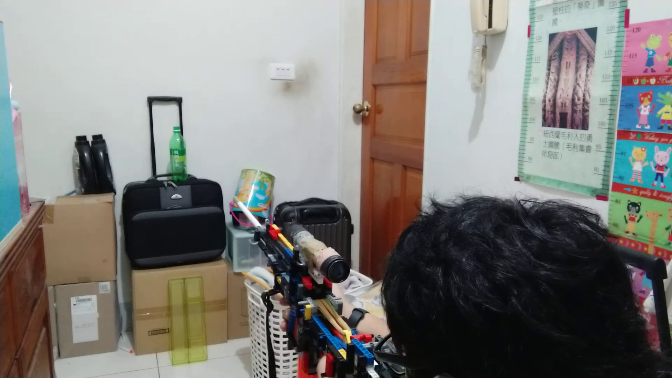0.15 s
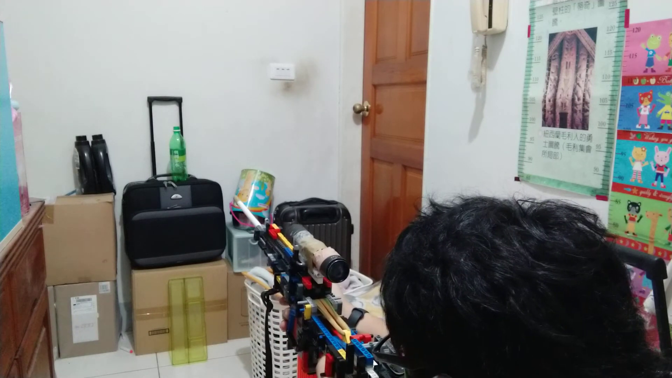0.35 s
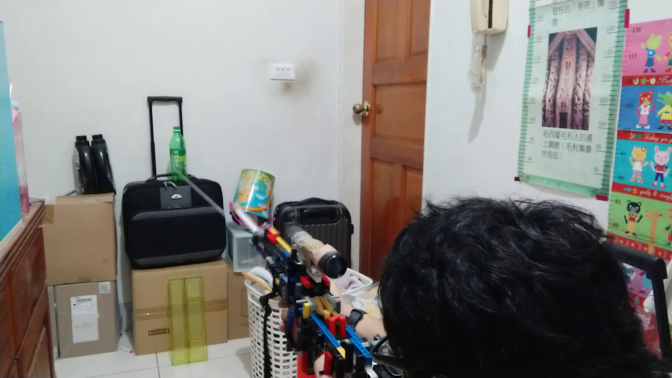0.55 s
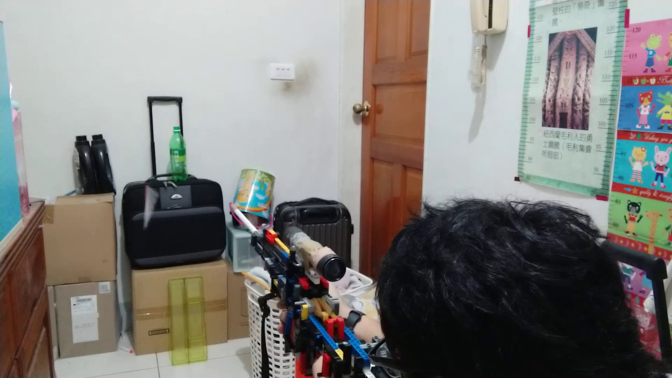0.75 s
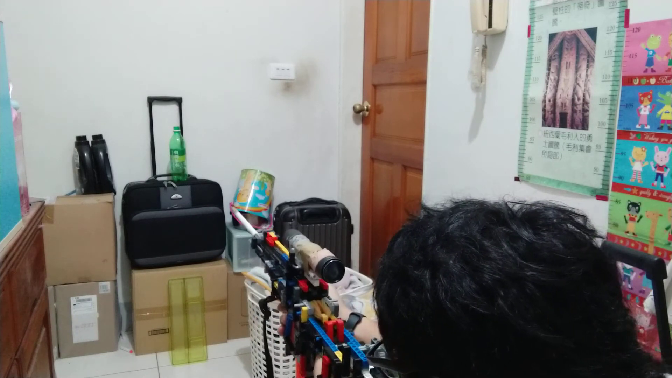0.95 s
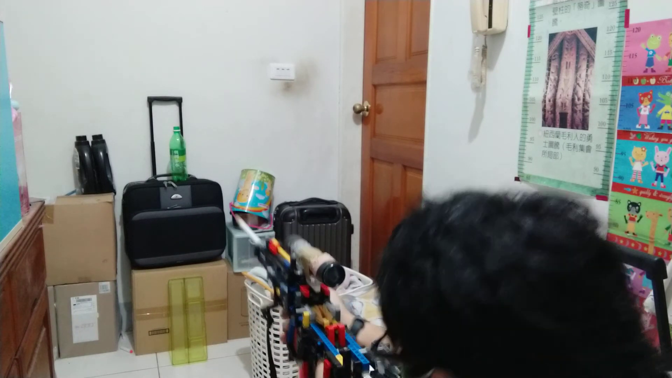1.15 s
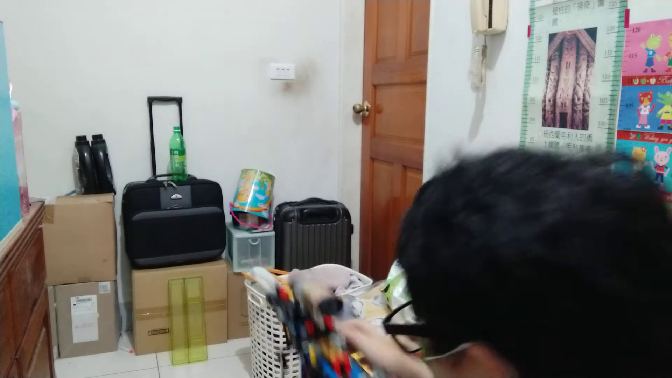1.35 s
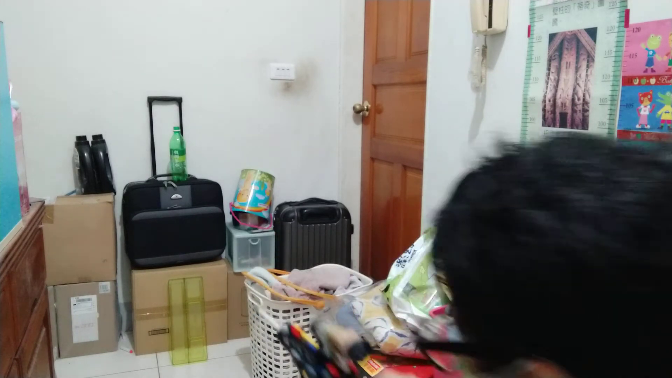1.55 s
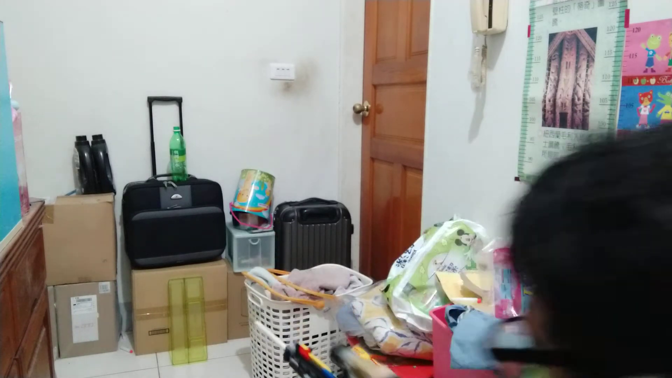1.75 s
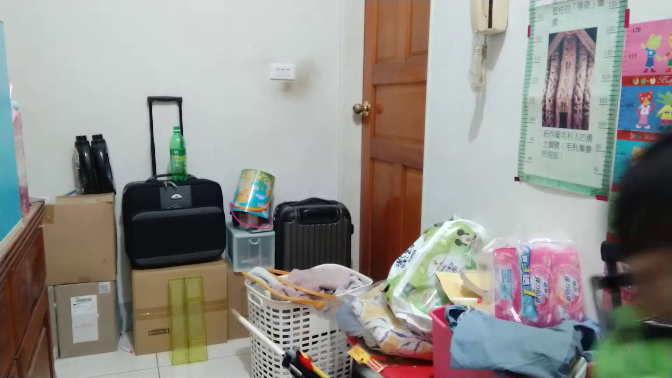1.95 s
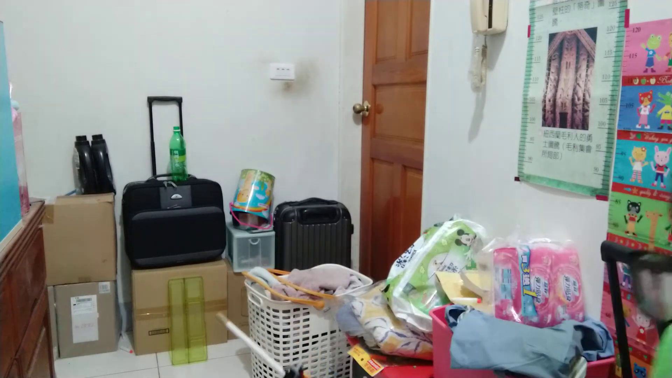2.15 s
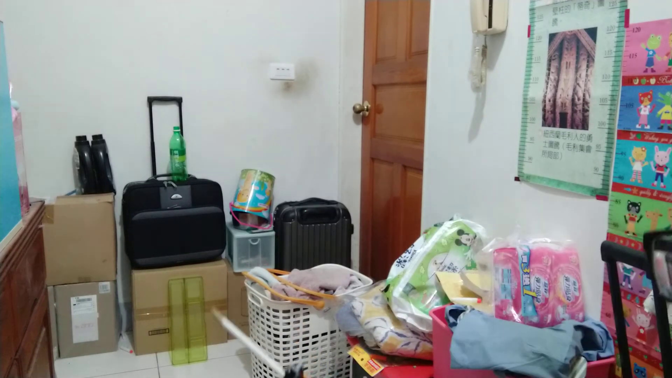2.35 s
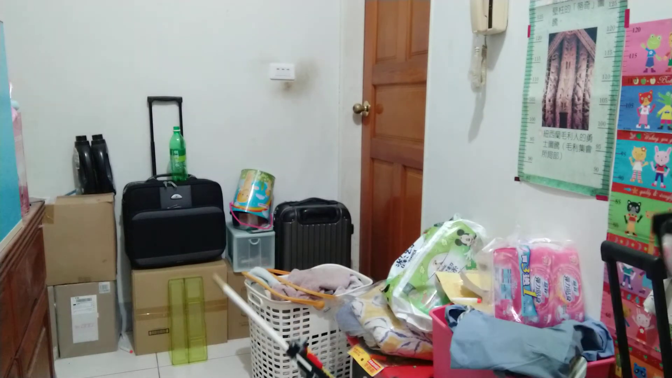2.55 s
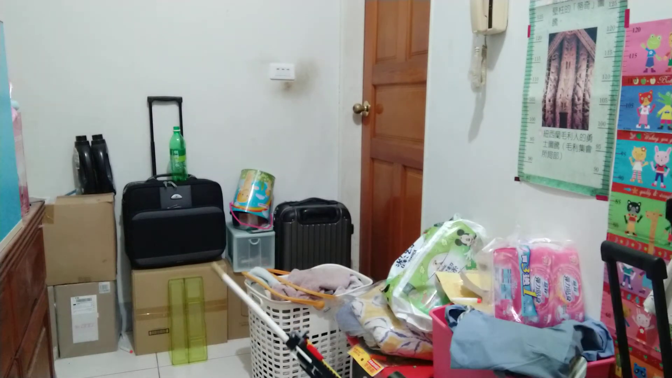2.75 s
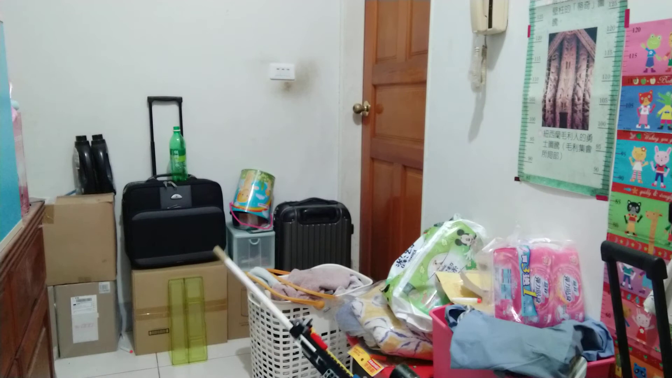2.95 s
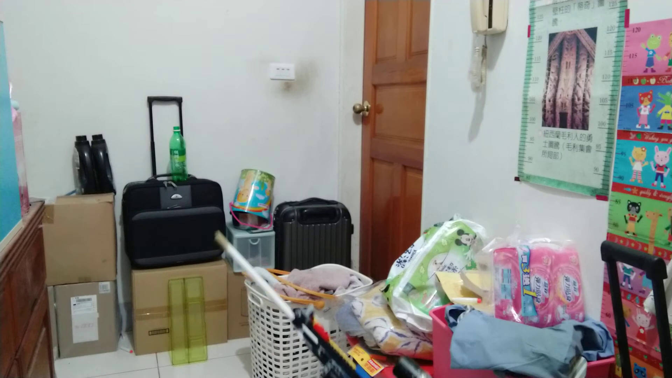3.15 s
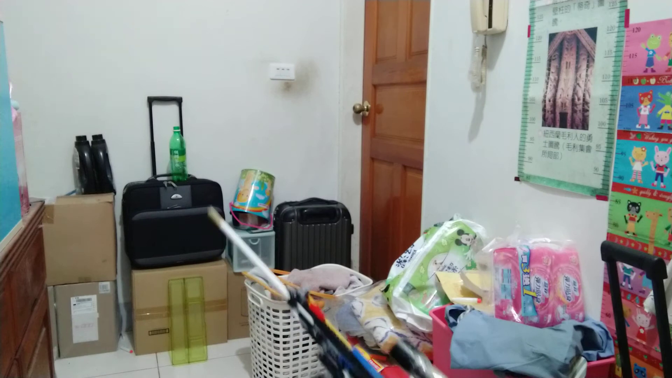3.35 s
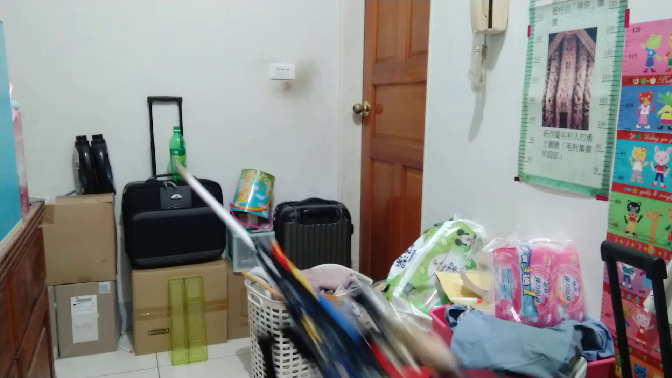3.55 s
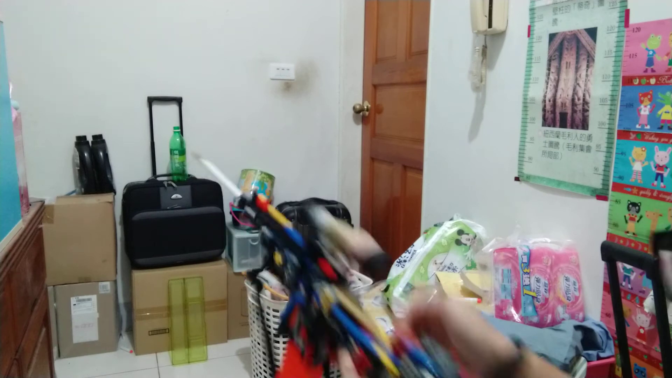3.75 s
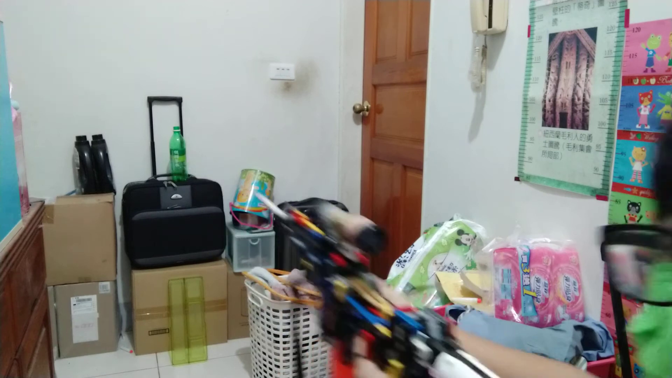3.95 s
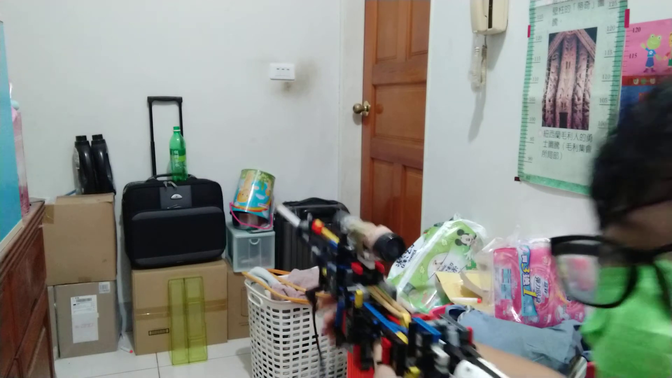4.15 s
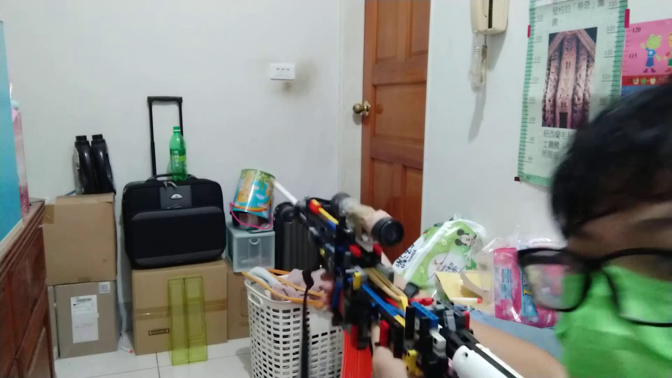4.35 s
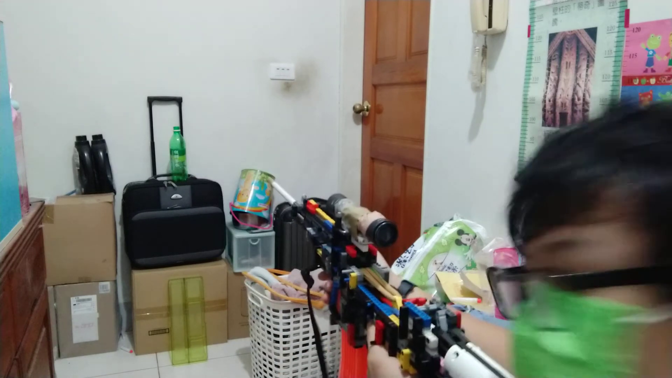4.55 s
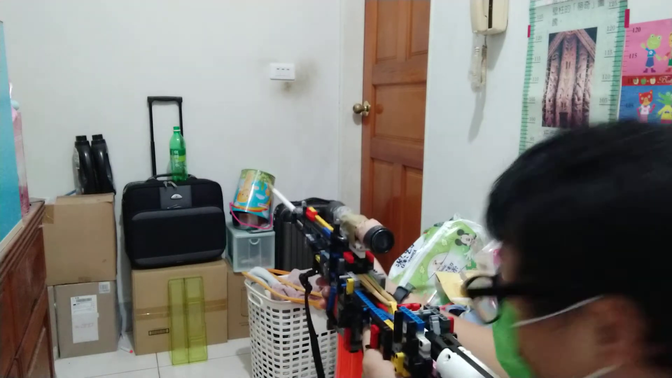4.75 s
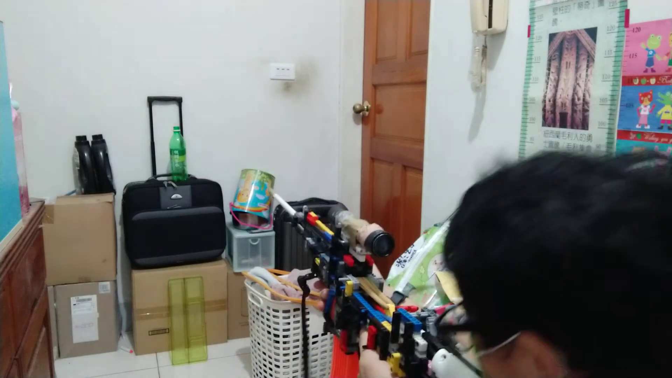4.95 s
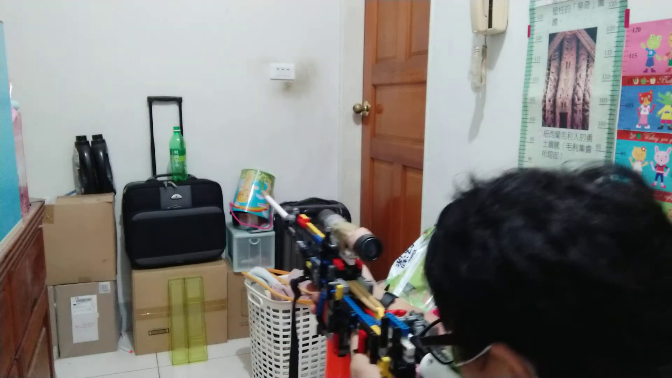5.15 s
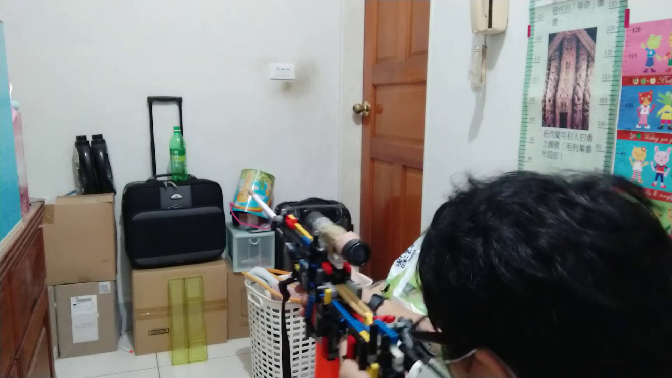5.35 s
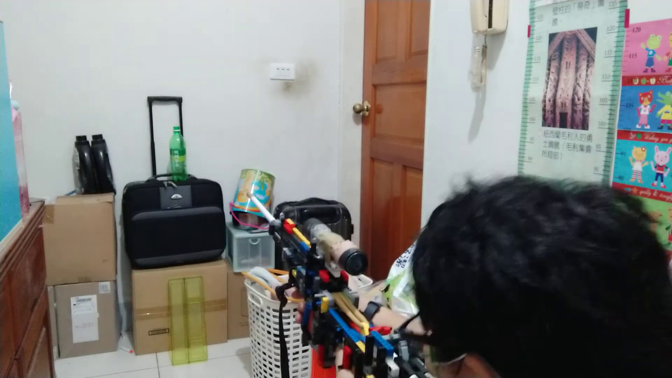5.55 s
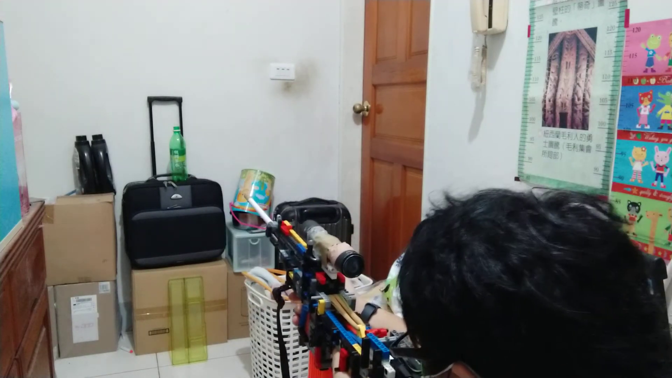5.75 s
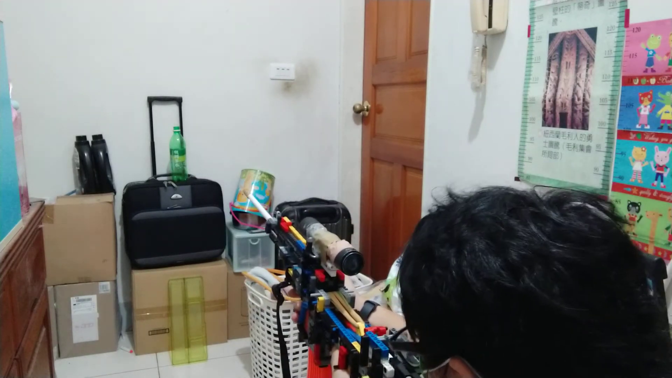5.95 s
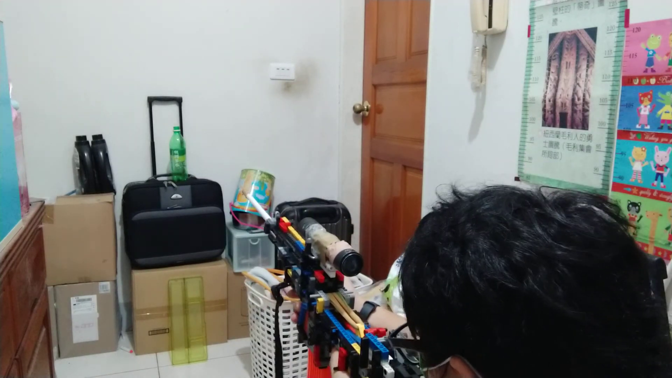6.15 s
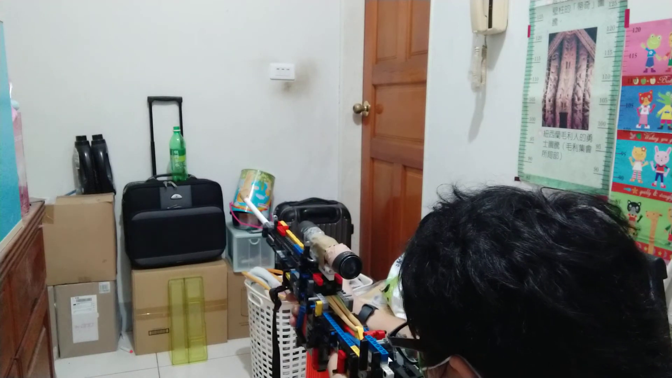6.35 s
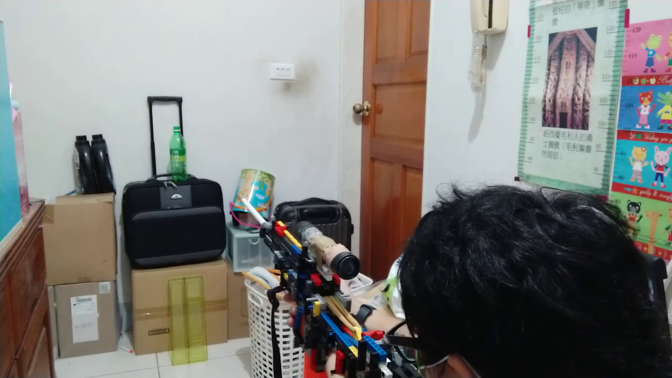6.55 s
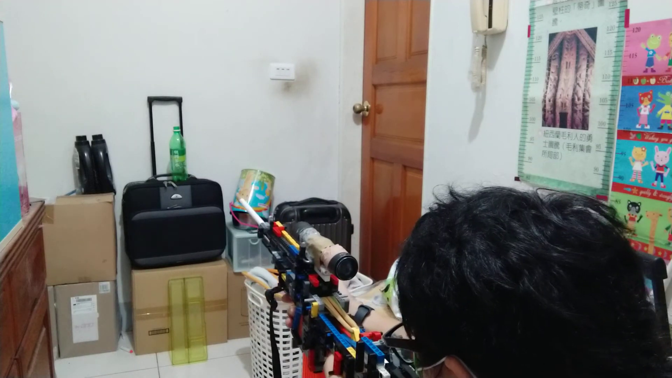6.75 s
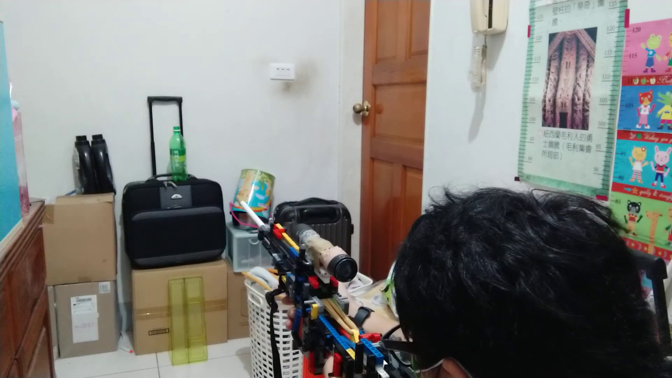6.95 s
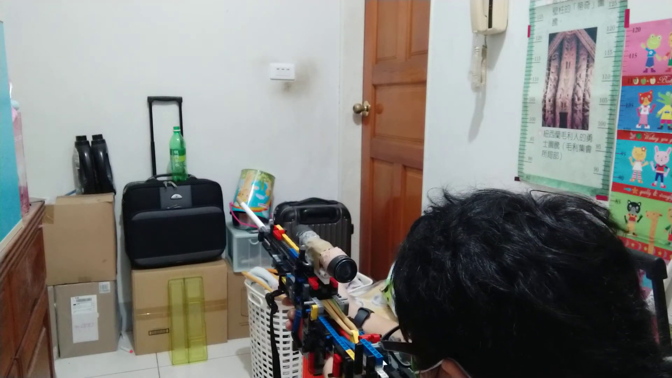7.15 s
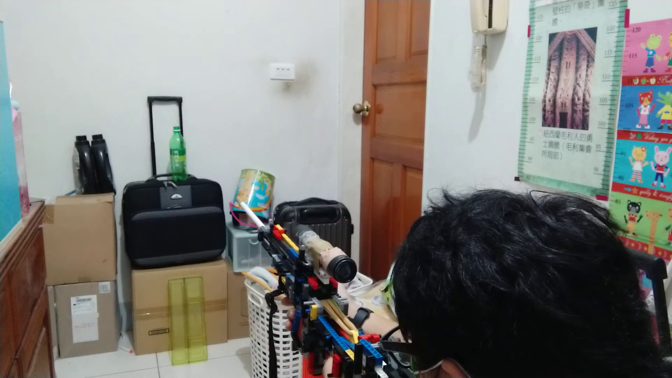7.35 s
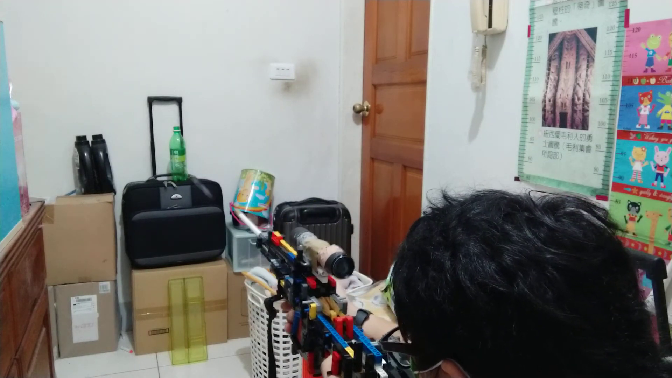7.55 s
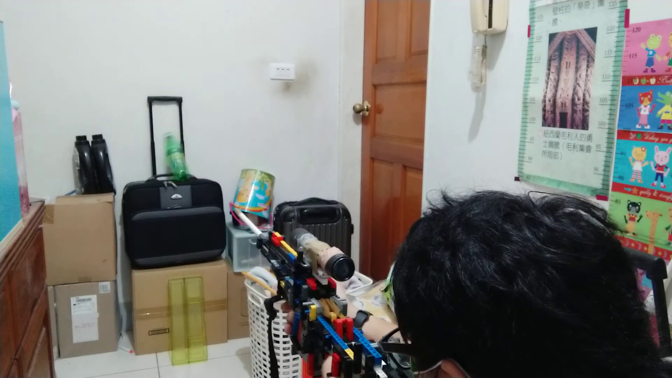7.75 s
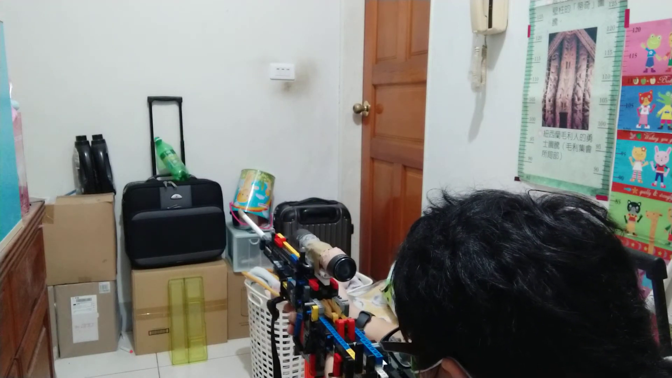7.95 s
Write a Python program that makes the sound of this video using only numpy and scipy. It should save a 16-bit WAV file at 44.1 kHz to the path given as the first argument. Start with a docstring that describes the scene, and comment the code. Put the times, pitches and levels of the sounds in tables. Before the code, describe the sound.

In a small bare-walled tiled room, a toy blaster fires with a loud sharp snap and a short bright echo. Plastic clicks, rustling and low chair creaks follow as it is handled, with one hard clack midway. After a quiet wait it fires again; the dart smacks hollow luggage and skips on the tiles. Close stereo recording with faint hum and hiss.

```python
"""A toy blaster of plastic parts is fired twice in a small tiled room, a step from a two-microphone recorder.
Each shot is three quick noise snaps; the dart rattles luggage, rings its hollow body and bounces on the tiles.
The toy also clicks and rustles in the hands (noise bursts and crackle through its frame resonances), and
a chair creaks (random slips into low modes, with a thin squeak) over wavering hum tones and hiss.
A decaying-noise echo answers, and a limiter holds the snaps down and lets the echo swell back."""
import sys
import numpy as np
from scipy import signal
from scipy.fft import rfft, irfft
from scipy.io import wavfile
from scipy.ndimage import uniform_filter1d, minimum_filter1d

SR = 44100
rng = np.random.default_rng(int(sys.argv[2]) if len(sys.argv) > 2 else 0)


def wrap_up_sound(samples):
    """Save the sound to the file named by the first command line argument, as 16-bit audio."""
    columns = np.atleast_2d(samples).T
    # keep every value between -1 and 1, then stretch to whole-number steps
    tamed = np.clip(columns, -1, 1)
    steps = np.round(tamed * 32767).astype(np.int16)
    wavfile.write(sys.argv[1], SR, steps)


def invert_db(level):
    """Linear amplitude ratio for a level in decibels (20 dB per decade), elementwise."""
    return 10 ** (np.asarray(level, dtype=float) / 20)


N = 352359
T = np.arange(N) / SR
TICK_LEAD = 64  # samples before the nominal onset of a tick


def unit(x):
    """Scale to rms 1."""
    return x / np.sqrt(np.mean(x ** 2))


def shaped(x, gain):
    """Multiply the spectrum by gain(Hz)."""
    size = x.shape[-1]
    hz = np.arange(size // 2 + 1) * SR / size + 1e-3
    return irfft(rfft(x) * gain(hz), size)


def colour(points):
    """Gain of (Hz, dB) points joined on a log frequency axis."""
    hz, db = np.transpose(points)
    return lambda f: invert_db(np.interp(np.log(f), np.log(hz), db, left=-90))


def peak(hz, width):
    """Gain of a resonance passed twice; width is the half-power width of one pass."""
    return lambda f: 1 / (1 + ((f - hz ** 2 / f) / width) ** 2)


def pair(size, apart=1 - 0.6):
    """Left and right noise of a diffuse field at two spaced microphones; apart < 1 for a source close by."""
    spacing_m, sound_speed_m_s = 0.31, 343
    mid, side = rng.standard_normal((2, size))
    alike = lambda f: np.sinc(2 * f * apart * spacing_m / sound_speed_m_s)
    mid = shaped(mid, lambda f: np.sqrt(1 + alike(f)))
    side = shaped(side, lambda f: np.sqrt(1 - alike(f)))
    return (mid + np.outer([1, -1], side)) / np.sqrt(2)


def add(out, s, sound):
    """Mix a sound in from time s."""
    i = int(s * SR)
    out[:, i:i + sound.shape[-1]] += sound[..., :N - i]


def steady(x, span_s):
    """Even out the level over span_s; rms 1."""
    power = uniform_filter1d(x ** 2, int(span_s * SR))
    return unit(x / np.sqrt(power + 1e-18))


def swells(rows, column, fall_db_s):
    """Gain of movements that swell, hold and fall away at a shared rate; overlaps add as power."""
    climb_db = 20  # the level climbs this much in one swell time
    power = 0
    for row in rows:
        s, swell, hold = row[:3]
        rising_db = (s - T) * climb_db / swell
        falling_db = (T - s - hold) * fall_db_s
        below_db = np.maximum(np.maximum(rising_db, falling_db), 0)
        power = power + invert_db(row[column] - below_db) ** 2
    return np.sqrt(power)


def tick(t60, gain):
    """A dying burst of noise, its spectrum evened out and then coloured; peak near 1."""
    size = SR // 3
    fade = invert_db(-30 * T[:size] / max(t60, .009))
    burst = pair(size, 0.37) * fade
    for _ in range(2):
        spectrum = rfft(burst * fade)
        burst = irfft(spectrum / np.abs(spectrum), size)
    sound = shaped(np.roll(burst, TICK_LEAD, axis=1), gain)
    sound[:, -SR // 10:] = 0
    return sound / np.sqrt(np.sum(sound ** 2) / (t60 * SR / 14))


# low machine tones: f/Hz, rms level/dB, rms pitch waver (share of f)
HUM_TONES = [(26.7, -54, 0.017), (52.8, -64.5, 0.033)]
# colour of the air and microphone hiss: f/Hz, relative level per Hz/dB
HISS_COLOUR = [(38, -8.5), (60, -4.5), (91, -18), (141, -10), (186, -15.5), (302, -16.5), (390, -20),
               (835, -19.5), (938, -19), (2310, -25), (2530, -27), (13700, -34), (15000, -42)]


def background():
    """A steady machine hum through the walls, slowly wavering tones, over air and microphone hiss."""
    hum = 0
    for hz, db, waver in HUM_TONES:
        drift = unit(shaped(rng.standard_normal(N), lambda f: 1 / (1 + (f / 3.2) ** 2)))
        phase = 2 * np.pi * hz * np.cumsum(1 + waver * drift) / SR
        hum = hum + invert_db(db) * np.sqrt(2) * np.sin(phase)
    hiss = shaped(pair(N, 0.73), colour(HISS_COLOUR))
    above_300_hz = shaped(hiss, lambda f: f > 300)
    return hum + invert_db(-66.5) * hiss / np.std(above_300_hz)


# resonances of the plastic frame: f/Hz, width of one pass/Hz, level over a flat response/dB
FRAME_MODES = [(770, 100, 2.5), (960, 150, -4), (2040, 770, -1), (2620, 170, 2.5), (5200, 820, -17)]


def frame(f):
    """Gain of the toy's plastic frame: its resonances over a flat response."""
    return 1 + sum(invert_db(db) * peak(hz, width)(f) for hz, width, db in FRAME_MODES)


# corner points of a click's colour: f/Hz
CLICK_COLOUR_HZ = (70, 750, 1200, 2200, 4800, 10000, 15000)
# clicks of the toy: t/s, relative level/dB, then the colour ahead of the frame: # level at 750 Hz/dB, at 2200
# Hz/dB and at 10 kHz/dB, each against 4.8 kHz; # the row at 1.036 s is the bright crack of the dart bouncing on
# the tiles
TOY_CLICKS = [(0.0338, -40.5, -5.5, 0, -8.5), (0.4907, -41.5, -14, -11, -1), (1.036, -39, -11.5, -14, -4),
              (1.1485, -37, -25, 0, -5), (1.2176, -36.5, 0, 12, 2), (1.2625, -28, -13.5, -8, -11),
              (1.5227, -34, -3.5, -11, -3.5), (1.6336, -37, -12, -6, -8.5), (1.9666, -41.5, -28, -10, -7),
              (2.1098, -45, -24, -13, -6), (2.2407, -41, -17, -1, -9), (2.3729, -37.5, -19, 2, 2),
              (2.4065, -36, -20, 2, -9), (2.5014, -37.5, 1, 14, -13), (2.581, -39, -30, -17, -1),
              (2.6625, -38, -5, -12, 5), (2.742, -36.5, 2.5, -23, 1.5), (2.835, -35.5, -30, -2, -6.5),
              (2.948, -38, -15, 1, -3), (2.9712, -56, -7, 6, -4), (2.9886, -25.5, 3, 9.5, -10),
              (3.138, -15, -10.5, -6.5, -7), (3.431, -37.5, -20, 6, -0.5), (3.465, -34.5, -19, 3.5, -4),
              (3.752, -41.5, 3, -7, -4.5), (4.039, -40.5, 2, -15, -19), (4.054, -31.5, 1.5, -4.5, -7.5),
              (4.0866, -28.5, -8, -4.5, -11), (4.1274, -42, 10, 3, -5), (4.2123, -42, -25, -23, -5),
              (4.3354, -36.5, -5.5, 0, -5.5), (4.575, -47.5, -17, -21, -2), (4.594, -41.5, -30, -5, 1),
              (5.0774, -46, -16, -18.5, 8), (5.1088, -51.5, -20, -10, -4), (5.272, -37, -1.5, 1.5, -6),
              (5.3084, -46, 5, 10, -10), (5.361, -39.5, -6, 1, 0), (5.449, -40, -6, 4, -3),
              (5.514, -39, -15, -25, -2), (6.055, -32, -36, -32, -4.5), (6.719, -49, -25.5, -12, -11),
              (6.9395, -41.5, -22, -9, -4.5), (7.26, -43, -24, -19, 0)]


def clicks():
    """Plastic parts tick against each other: short bursts, each with its own colour, through the frame; one
    adds a bright crack to the dart's bounce at 1.036 s."""
    out = np.zeros((2, N))
    for s, db, low_db, mid_db, top_db in TOY_CLICKS:
        between_db = (low_db + mid_db) / 2
        levels = (low_db - 15, low_db, between_db, mid_db, 0, top_db, top_db - 1.5)
        tone = colour(list(zip(CLICK_COLOUR_HZ, levels)))
        burst = tick(0.0093, lambda f: tone(f) * frame(f))
        add(out, s - TICK_LEAD / SR, invert_db(db) * burst)
    return out


# echo bands: f/Hz, t60/s, starting level against the other bands/dB
ECHO_BANDS = [(152, 0.87, -4.5), (348.7, 0.51, 6), (730, 0.45, 15), (1546, 0.64, 7.5), (3040, 0.5, 2),
              (5800, 0.59, 3), (8800, 0.48, 6), (14700, 0.38, 12.5)]


def room(x):
    """Bare walls and tiles: dense noise bands, each dying at its own rate, answer the left channel of x."""
    t, noise, echo = T[:SR], pair(SR), 0
    for hz, t60, db in ECHO_BANDS:
        band = shaped(noise, lambda f: np.exp(-(np.log2(f / hz) / 0.96) ** 2))
        echo = echo + band * invert_db(db - 60 * t / t60)
    onset = np.clip((t - .002) / 0.001, 0, 1)
    near_furniture = 1 + 0.52 * np.exp(-t / 0.011)  # answers first
    echo = echo * onset * near_furniture
    echo = echo / np.sqrt(np.sum(echo ** 2) / 2)
    return invert_db(5.5) * signal.fftconvolve(x[:1], echo, axes=1)[:, :N]


# the two microphones face the scene differently: f/Hz, left minus right level/dB
FACING_COLOUR = [(0.001, 7.5), (300, 1.5), (1300, -1), (2300, -1), (4300, -4.5), (8000, -4), (11000, 5),
                 (14600, 7.5)]


def facing(x):
    """Split the colour difference of the two microphones evenly between left and right."""
    return shaped(x, lambda f: colour(FACING_COLOUR)(f) ** np.array([[.5], [-.5]]))


# snaps of the shots: t/s, relative level/dB, left minus right level ahead of the facing/dB, nominal t60/s
SHOT_SNAPS = [(.5150, -3, -4, 0.016), (0.5181, -6, -4.5, 0.01), (0.522, 12.5, -2, 0.0063),
              (7.4999, -6.5, -4.5, 0.016), (7.4992, 0, 3.5, 0.0089), (7.5057, 15.5, -2.5, 0.0089)]
# colour of a snap: f/Hz, relative level per Hz/dB
SNAP_COLOUR = [(150, -19), (600, -14), (1500, -9), (2900, -5), (3700, -6), (4800, -1), (5800, -3.5),
               (6800, -3.5), (9000, -8.5), (14000, -12)]


def shots():
    """The spring lets go: latch, plunger and stop snap within a few ms."""
    out = np.zeros((2, N))
    for s, db, pan_db, t60 in SHOT_SNAPS:
        gain = invert_db(db + np.array([[pan_db], [-pan_db]]) / 2)
        add(out, s - TICK_LEAD / SR, gain * tick(t60, colour(SNAP_COLOUR)))
    return out


# zero-line jolts: t/s, drop and rebound (amplitudes of the two decays ahead of the limiter)
ZERO_JOLTS = [(0.5225, 1, 0.44), (7.5044, 0.44, 0.2)]


def jolts():
    """Each shot jolts the left zero line, and the right at 3 %: a fast drop against a slower rebound."""
    t = T[:SR]
    zero = np.zeros((2, N))
    for s, drop, rebound in ZERO_JOLTS:
        jolt = rebound * np.exp(-t / 0.11) - drop * np.exp(-t / 0.042)
        jolt = jolt * np.minimum(t / 0.00026, 1)
        add(zero, s, np.outer([1, .03], jolt))
    return zero


def ring(modes, apart):
    """Modes kept rough by a rattling contact: narrow noise in each, dying at its own rate."""
    t = T[:SR // 2]
    waves = 0
    for hz, db, width, t60 in modes:
        narrow = steady(shaped(pair(SR // 2, apart), peak(hz, width)), 0.12)
        waves = waves + invert_db(db - 60 * t / t60) * narrow
    return waves * np.minimum(t / 0.0022, 1)


# dart against the luggage: t/s, relative level/dB, relative share of the hollow body/dB, t60 of the rattle/s
LUGGAGE_STRIKES = [(.612, -12, -24.5, 0.076), (7.587, 7, 0, 0.097), (7.609, -10, 10.5, 0.023),
                   (7.66, -12.5, 5, 0.075)]
# hollow body that the dart strikes: f/Hz, relative level/dB, width of one pass/Hz, t60/s
LUGGAGE_MODES = [(185, -4.5, 37, 0.58), (360, -1, 80, 0.45), (467.6, -1, 36, 0.42), (610, 5.5, 74, 0.071),
                 (791, -13, 25, 0.97), (973, -3.5, 51, 0.41), (2004, -22, 83, .3)]
# colour of the rattle: f/Hz, relative level per Hz/dB
RATTLE_COLOUR = [(160, -16), (400, -2), (800, -1), (2000, 2), (5000, 0.5), (14000, -25)]
# dart bouncing on the tiles: t/s, relative level/dB, share of its ring/dB
TILE_BOUNCES = [(.655, -31, -10), (1.034, -33.5, -10), (7.836, -13.5, -8), (7.848, -12, -36),
                (7.873, -27, -2), (7.937, -25.5, -8.5)]
# colour of a bounce: f/Hz, relative level per Hz/dB
TAP_COLOUR = [(250, -19), (600, -11), (1000, -1.5), (1450, -3), (1800, -7), (2600, -13), (4000, -13),
              (14000, -40)]
# ring of the dart: f/Hz, relative level/dB, width of one pass/Hz, t60/s
DART_RING = [(939, -2, 37, 0.13), (1066, -6.5, 90, 0.18), (1340, -20.5, 74, 0.17), (1427, 2, 65, 0.33),
             (2600, -8, 330, 0.23)]


def dart():
    """The dart rattles against the luggage and booms its hollow body, then skips on the tiles.
    The slow rings carry the room's decay in their own."""
    out, rings = np.zeros((2, 2, N))
    size = SR // 3
    for s, db, body_db, t60 in LUGGAGE_STRIKES:
        rattle = unit(shaped(pair(size, .6), colour(RATTLE_COLOUR)))
        add(out, s, invert_db(db - 10) * rattle * invert_db(-60 * T[:size] / t60))
        add(rings, s, invert_db(db + body_db - 20) * ring(LUGGAGE_MODES, 0.84))
    for s, db, ring_db in TILE_BOUNCES:
        add(out, s - TICK_LEAD / SR, invert_db(db) * tick(0.015, colour(TAP_COLOUR)))
        add(rings, s, invert_db(db + ring_db) * ring(DART_RING, 0.54))
    return out, rings


# hands and sleeves on the toy: t of full level/s, swell/s, hold/s, bright crackle level/dB, dull crackle level/dB
HANDLING = [(1.27, 0.38, 0.18, -59.5, -71), (1.967, .06, .08, -77, -93), (2.18, 0.22, 0.34, -69, -76.5),
            (2.73, 0.32, 0.03, -56, -78), (2.994, 0.09, 0.013, -47.5, -60),
            (3.136, .02, 0.0089, -58, -59.5), (3.383, 0.2, 0.12, -66, -81.5), (3.79, 1, 0.035, -67.5, -78),
            (4.05, 0.04, 0.036, -52, -67), (4.353, .07, 0.0088, -71.5, -84),
            (4.608, .08, 0.009, -65.5, -88), (5.1, 0.34, 0.012, -73.5, -80), (5.288, 0.045, 0.34, -67, -76)]
# colour of the crackle ahead of the frame: f/Hz, relative level per Hz/dB
CRACKLE_COLOUR = [(300, -7.5), (600, -13.5), (1500, -10.5), (3000, -16), (5500, -13), (9000, -20),
                  (14000, -22)]


def rustle():
    """Dense tiny crackles of uneven size, bright ones from plastic and dull ones from cloth."""
    fall_db_s, grains_per_s = 116, 1200
    uneven = invert_db(2 * rng.exponential(size=N))
    grains = pair(N, .7) * uneven * (rng.random(N) < grains_per_s / SR)
    grains = shaped(grains, lambda f: colour(CRACKLE_COLOUR)(f) * frame(f))
    dull = shaped(grains, lambda f: 1 / (1 + (f / 2200) ** 4))
    bright = unit(grains - dull)
    bright_gain = swells(HANDLING, 3, fall_db_s)
    dull_gain = swells(HANDLING, 4, fall_db_s)
    return bright_gain * bright + dull_gain * unit(dull)


# the chair takes weight: t of full level/s, swell/s, hold/s, thud level/dB, level of the frame's ring/dB
CHAIR_LURCHES = [(2.24, 0.1, 0.037, -40, -47), (2.35, 0.06, 0.073, -49.5, -47), (2.52, .12, .13, -57, -53),
                 (2.77, 0.093, 0.042, -56, -63), (2.95, .06, .01, -57.5, -69)]
# low modes of the thud: f/Hz, width of one pass/Hz, relative level/dB
THUD_MODES = [(58.6, 20, 1), (75, 11, 2), (204, 58, -9.5)]
# joints rubbing: t of full level/s, swell/s, hold/s, relative level/dB
JOINT_RUBS = [(2.22, 0.19, 0.2, -61), (3.33, 0.25, .1, -68), (3.96, 0.13, 0.032, -63.5)]
# modes of the squeak: f/Hz, width of one pass/Hz, relative level/dB
SQUEAK_MODES = [(1506, 215, -4.5), (2060, 1300, -5), (403, 320, -9)]


def chair():
    """Uneven slips in the joints shake the low frame modes, one of which rings steadily; rubbing feeds a squeak."""
    lurch_fall_db_s, rub_fall_db_s = 355, 55
    slips = rng.standard_normal(N) * (rng.random(N) < 300 / SR)  # about 300 a second
    thud = sum(invert_db(db) * unit(shaped(slips, peak(hz, width))) for hz, width, db in THUD_MODES)
    thud = steady(thud, 0.072)
    frame_ring = steady(shaped(slips, peak(118.5, 5.1)), 0.11)
    grip = invert_db(1.2 * rng.exponential(size=N // 200 + 1)).repeat(200)[:N]  # a new strength every 200 samples
    scrape = pair(N) * grip
    squeak = sum(invert_db(db) * unit(shaped(scrape, peak(hz, width))) for hz, width, db in SQUEAK_MODES)
    thud_gain = swells(CHAIR_LURCHES, 3, lurch_fall_db_s)
    ring_gain = swells(CHAIR_LURCHES, 4, lurch_fall_db_s)
    groan = thud_gain * thud + ring_gain * frame_ring
    return groan, swells(JOINT_RUBS, 3, rub_fall_db_s) * squeak


def scene():
    """Shots, clicks, hits, rustle and squeak sound directly and through the room; rings, groan and hum add dry."""
    ticks = clicks()
    hits, rings = dart()
    groan, squeak = chair()
    far = shots() + hits + rustle() + squeak
    direct = far + invert_db(0.3) * ticks  # the toy is nearer than the dart: more direct sound against the echo
    return facing(direct + room(far + ticks) + rings) + groan + background()


def band_limit(x):
    """A steep low-pass at the top of the band."""
    return signal.sosfilt(signal.butter(12, 15160, fs=SR, output="sos"), x)


def record(dry):
    """A steep low-pass, then a limiter that looks 1 ms ahead, drops at once and recovers at a steady dB rate."""
    ceiling_db, release_db_s, top_hz = -.5, 114.5, 14250
    dry = signal.sosfilt(signal.ellip(8, .3, 36, top_hz, fs=SR, output="sos"), dry)
    ahead = SR // 1000
    level_db = 20 * np.log10(np.abs(dry).max(axis=0) + 1e-9)
    need_db = np.minimum(ceiling_db - level_db, 0)
    climb_db = release_db_s * T
    gain_db = np.minimum.accumulate(minimum_filter1d(need_db, 2 * ahead) - climb_db) + climb_db
    gain = invert_db(uniform_filter1d(gain_db, ahead))
    mix = (dry + jolts()) * gain  # the jolts are turned down too, but do not steer the limiter
    return band_limit(mix)


dry = scene()
out = record(dry)
wrap_up_sound(out)
```